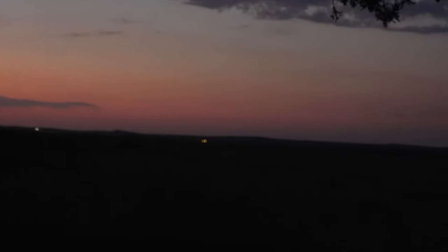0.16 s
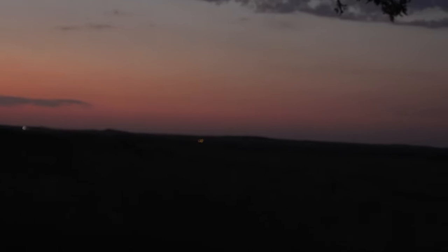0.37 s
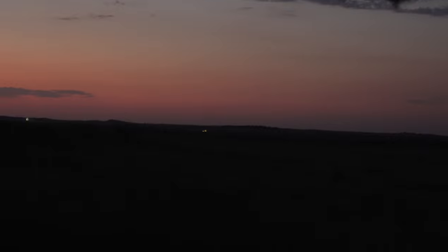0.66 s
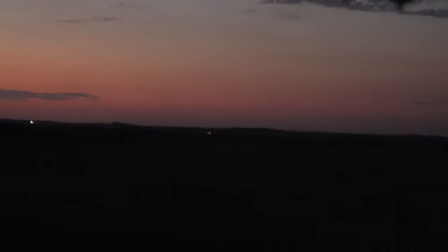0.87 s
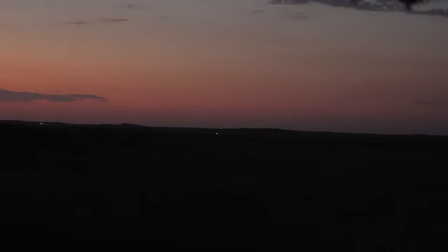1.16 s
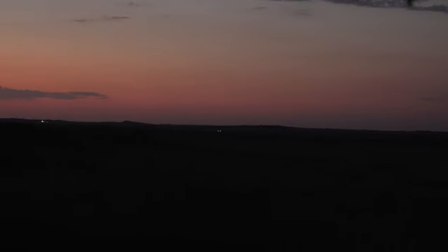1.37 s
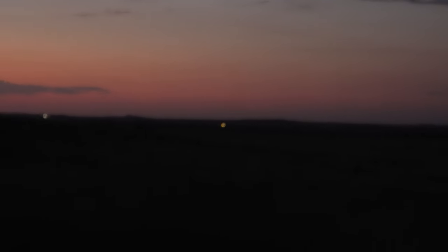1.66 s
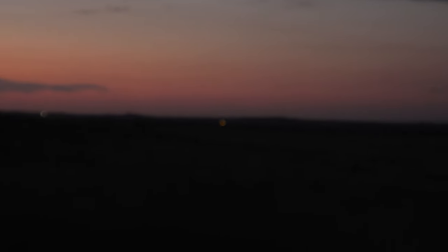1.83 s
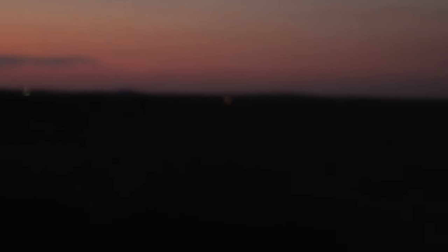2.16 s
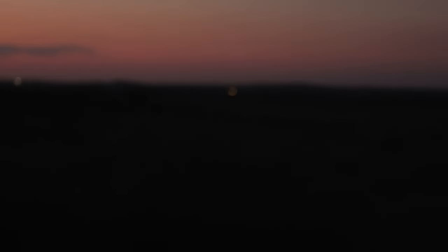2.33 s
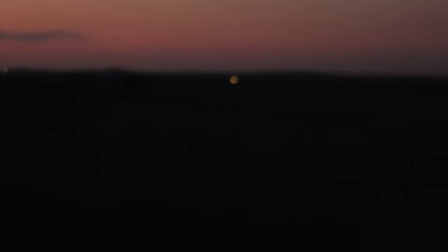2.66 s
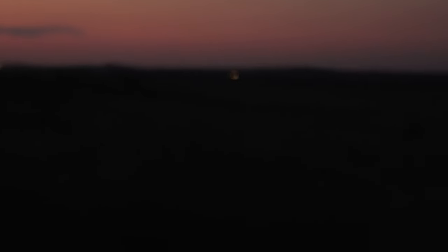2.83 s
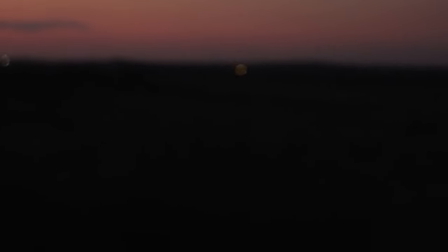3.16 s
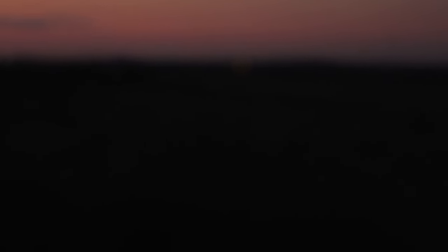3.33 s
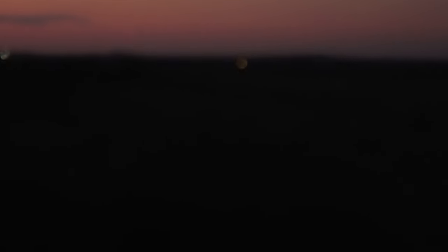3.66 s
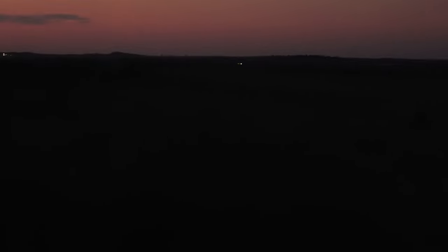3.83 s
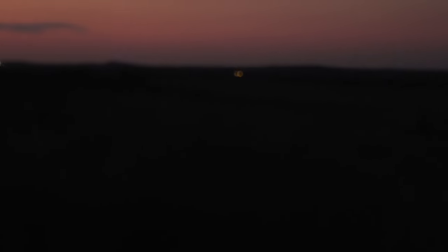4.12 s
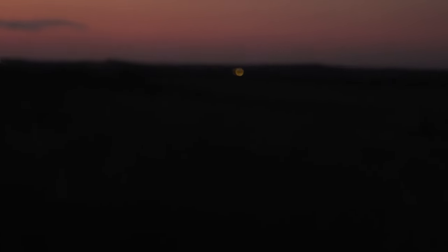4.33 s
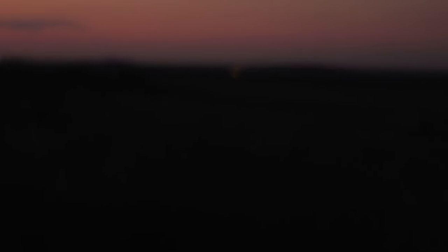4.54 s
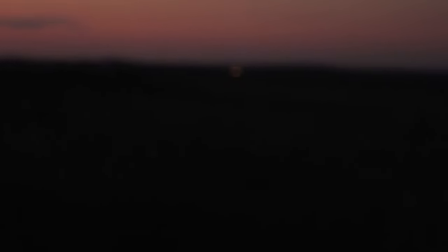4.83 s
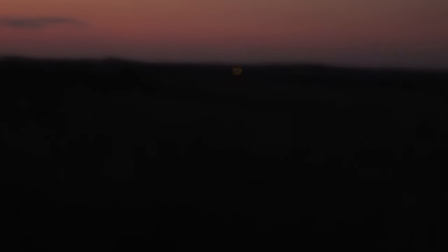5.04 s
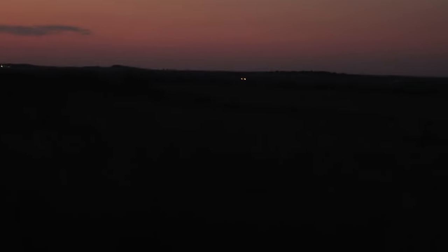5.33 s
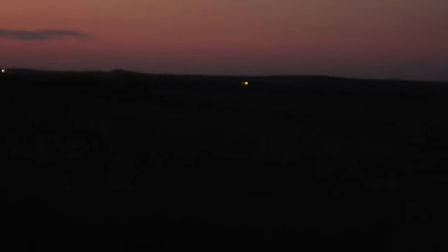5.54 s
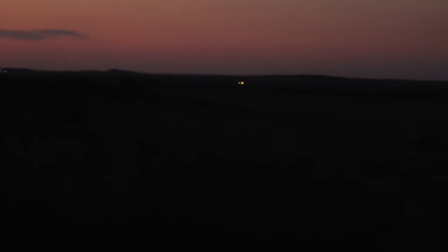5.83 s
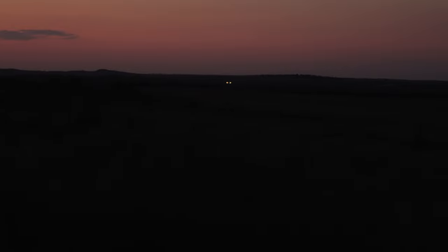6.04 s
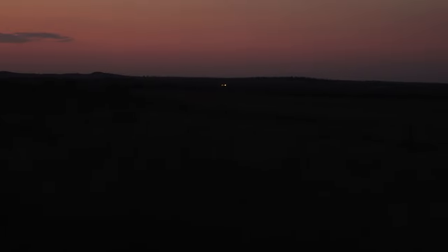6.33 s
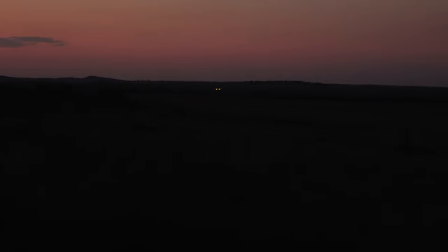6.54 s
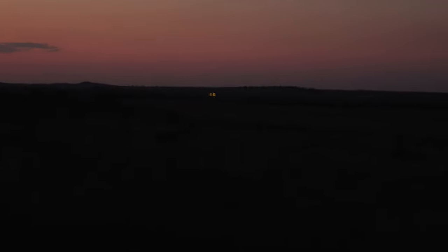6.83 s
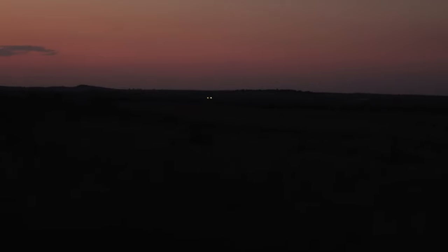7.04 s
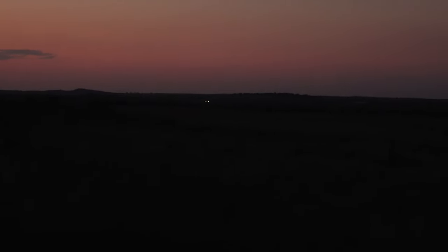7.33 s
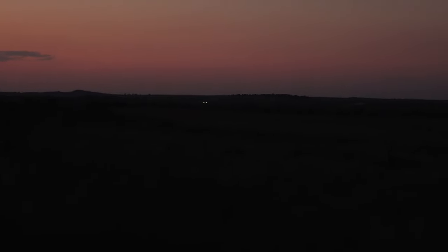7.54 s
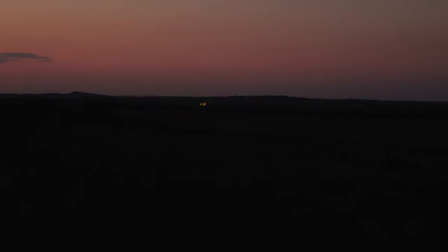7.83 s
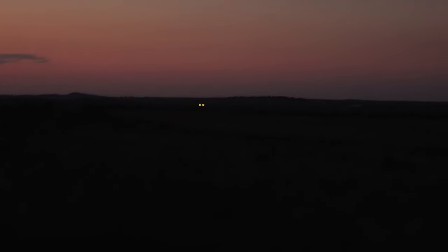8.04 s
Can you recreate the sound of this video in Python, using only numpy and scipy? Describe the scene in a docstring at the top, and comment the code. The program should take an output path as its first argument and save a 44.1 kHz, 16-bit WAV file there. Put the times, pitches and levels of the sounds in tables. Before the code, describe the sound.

An evening insect chorus shimmers steadily outdoors with low wind rumble, then a close tree cricket bursts into a long, loud, pulsing trill.

```python
"""Dusk over open fields, a hand-held microphone in light wind. From the start far tree crickets trill, field
crickets chirp, other insects buzz, tick and whine, and the wind rumbles; all this goes on throughout.
A near tree cricket trills briefly at 0.3 s; a close field cricket chirps at 1.2 and 3.3 s. From 5.6 s the near
one gives a long loud trill while soft knocks reach the housing. Cricket strokes and ticks are swelling, falling
near-sines; the buzz is chopped resonant noise, the whine a sine, wind and air are coloured noise."""
import sys
import numpy as np
from scipy import signal
from scipy.fft import rfft, irfft, next_fast_len
from scipy.io import wavfile

SR = 44100
rng = np.random.default_rng(int(sys.argv[2]) if len(sys.argv) > 2 else 0)


def master_out(mix):
    """Clip the mix to full scale and print it as 16-bit PCM to the path in sys.argv[1]."""
    frames = np.transpose(np.atleast_2d(mix))
    ceiling = np.clip(frames, -1, 1)
    pcm = np.round(ceiling * 32767).astype(np.int16)
    wavfile.write(sys.argv[1], SR, pcm)


N = 360738


def from_db(db):
    """Decibels to gain."""
    return 10 ** (np.asarray(db, float) / 20)


def rms_one(x):
    """Scale to rms 1."""
    return x / np.sqrt(np.mean(x ** 2) + 1e-20)


def in_time(rows):
    """Columns of a curve table, interpolated to one value per sample."""
    s, *columns = np.transpose(rows)
    return [np.interp(np.arange(N) / SR, s, column) for column in columns]


def drift(rate):
    """Slow random curve of rms 1, changing about `rate` times a second."""
    knots = rng.standard_normal(N // 40 + 2002)  # one knot every 40 samples
    r = np.exp(-80 * np.pi * rate / SR)
    slow = signal.lfilter([1], [1, -2 * r, r * r], knots)[2000:]  # the filter has settled by here
    return np.interp(np.arange(N) / 40, np.arange(len(slow)), rms_one(slow))


def coloured(spectrum):
    """Noise of rms 1 whose density follows the given curve."""
    size = next_fast_len(N)
    hz = np.maximum(np.arange(size // 2 + 1) * SR / size, 1)
    points_hz, points_db = np.transpose(spectrum)
    gain = from_db(np.interp(np.log(hz), np.log(points_hz), points_db))
    white = rfft(rng.standard_normal(size))
    return rms_one(irfft(white * gain, size)[:N])


def resonance(x, hz, width_hz):
    """Two-pole resonance with gain 1 on top."""
    r = np.exp(-np.pi * width_hz / SR)
    feedback = [1, -2 * r * np.cos(2 * np.pi * hz / SR), r * r]
    return signal.lfilter(np.array([1, 0, -1]) * (1 - r * r) / 2, feedback, x)


def strokes(mid_s, hz, peak_db, length_s, fall_hz, bend, peak_at, pointed, overtones_db, rough, turns=None):
    """Wing strokes: scraper over file drives the wing as a near sine that slows down towards the end."""
    share = np.linspace(0, 1, int(length_s * SR))
    chance = rng.standard_normal((len(mid_s), 9))
    # the given pitch holds at mid-stroke; fall_hz is the whole drop from start to end
    slowing = share ** bend - .5 ** bend
    phase = np.cumsum(np.asarray(hz)[:, None] - fall_hz * slowing, axis=1) * 2 * np.pi / SR
    # where the wing stands in its swing at mid-stroke: given, or by chance
    turns = chance[:, 0] if turns is None else turns
    phase = phase - phase[:, [len(share) // 2]] + 2 * np.pi * turns[:, None]
    # warp time so that the swell peaks at peak_at
    warp = np.log(.5) / np.log(np.clip(peak_at, .2, .8))
    swell = np.abs(np.sin(np.pi * share ** warp)) ** pointed
    # uneven teeth make the level wobble within a stroke
    wobble = chance[:, 1:] @ np.cos(np.pi * np.outer(np.arange(1, 9), share)) / 2
    overtones = sum(from_db(db) * np.sin((k + 2) * phase) for k, db in enumerate(overtones_db))
    tone = np.sin(phase) + overtones
    sound = from_db(peak_db)[:, None] * swell * (1 + rough * wobble) * tone
    start = np.round((np.asarray(mid_s)[:, None] - length_s / 2) * SR).astype(int)
    at = start + np.arange(len(share))
    inside = (at >= 0) & (at < N)
    return np.bincount(at[inside], sound[inside], N)


def chirped(first_s, gap_ms, count):
    """Stroke times of chirps, one row per chirp; the gap runs from middle to middle."""
    gaps_ms = gap_ms * np.ones(len(first_s))
    return np.asarray(first_s)[:, None] + np.outer(gaps_ms, np.arange(count)) / 1000


# Microphone self-noise, relative density: pitch_hz, level_db (per Hz)
HISS = [(25, -16), (100, -17), (200, -2.5), (400, 0), (1000, -2.5), (1500, -15), (2800, -7.5), (4500, -31),
        (6000, -13.5), (7500, -0.5), (15700, -2.5)]
HISS_DB = -79.5  # rms


def microphone_hiss():
    """Self-noise of the microphone, of opposite sign in the two channels."""
    return from_db(HISS_DB) * coloured(HISS) * np.array([[1], [-1]])


# Distant air and fields, relative density: pitch_hz, level_db (per Hz)
AIR = [(120, -2.5), (250, 3), (420, -3.5), (700, 0), (900, -3), (1400, 0), (2000, -2), (3000, -6.5),
       (5300, -4.5), (7500, -7), (8200, -18.5), (11500, -16.5), (12500, -23), (15700, -20)]
AIR_DB = -62.5  # rms before a slow drift


def distant_air():
    """The open distance: broad coloured noise that drifts slightly in level."""
    return from_db(AIR_DB + .5 * drift(0.59)) * coloured(AIR)


# Wind at the microphone, rms before gusting: time_s, rumble_db, flutter_db
WIND = [(0.0, -56, -53), (0.8, -49.5, -61.5), (1.25, -55.5, -52.5), (1.59, -52.5, -61), (1.93, -58.5, -56),
        (2.53, -50.5, -58), (3.26, -50, -55), (3.6, -54, -58), (4.51, -56.5, -58), (4.97, -54.5, -54),
        (5.49, -58, -58.5), (5.76, -58.5, -53.5), (6.3, -59.5, -63.5), (6.88, -60, -56), (7.36, -64, -58),
        (7.61, -56, -57.5), (8.18, -60.5, -55.5)]
# Deep rumble, relative density: pitch_hz, level_db (per Hz)
RUMBLE = [(8.8, -31), (15, 2), (55, 5), (76, 0.5), (110, -7.5), (140, -42), (240, -120)]
# Higher flutter, relative density: pitch_hz, level_db (per Hz)
FLUTTER = [(47, -38), (80, -4.5), (141, -7), (226, -21.5), (387, -33), (450, -30.5), (580, -50),
           (990, -120)]


def wind():
    """Turbulence on the port: two lumpy low noises."""
    rumble_db, flutter_db = in_time(WIND)
    rumble = from_db(rumble_db + 2.5 * drift(4.7)) * coloured(RUMBLE)
    flutter = from_db(flutter_db + 1.42 * drift(16.5)) * coloured(FLUTTER)
    return rumble + flutter


# Faint whine, rms before its waver: time_s, level_db
WHINE = [(0.0, -72.5), (0.6, -73.5), (0.8, -78), (2.1, -75.5), (2.8, -84), (3.8, -76), (5.2, -91),
         (6.2, -75), (7.5, -75), (8.18, -83)]
WHINE_HZ = 1369.5


def whine():
    """A thin tone of steady pitch that wavers in level."""
    tone = np.sqrt(2) * np.sin(2 * np.pi * WHINE_HZ * np.arange(N) / SR)
    return from_db(in_time(WHINE)[0] + 1.3 * drift(2.6)) * tone


# Far tree crickets, before swell and sway: strokes_per_s, pitch_hz, peak_db
FAR_SINGERS = [(47.2, 3720, -53), (46.7, 3790, -56.5), (47.64, 3660, -56.5), (48, 3850, -58),
               (44.8, 3600, -66), (49.57, 3920, -52.5), (50.53, 3760, -55.5), (44.75, 3700, -63),
               (47.63, 3640, -57.5), (49.5, 3810, -60), (45.9, 3750, -62.5), (51.1, 3890, -57)]
# Level of the whole far chorus, slowly rising: time_s, level_db
FAR_SWELL = [(0.0, -1.5), (8.18, 1)]
# Shape of a far wing stroke, by keyword of strokes()
FAR_STROKE = dict(length_s=.017, fall_hz=230, bend=0.92, peak_at=0.46, pointed=0.95, overtones_db=[],
              rough=.2)
FAR_SWAY_DB = 1.6


def far_tree_crickets():
    """Each singer keeps its own rate, wandering a little, and its level sways with the air."""
    out = 0
    for per_s, hz, db in FAR_SINGERS:
        chance = rng.standard_normal((460, 3))
        wander_s = .00025 * np.cumsum(chance[:, 0])
        s = rng.random() / per_s + np.arange(460) / per_s + wander_s
        sway_db = FAR_SWAY_DB * drift(1.2)[np.clip(s * SR, 0, N - 1).astype(int)]
        peak_db = db + sway_db + 0.6 * chance[:, 2]
        out = out + strokes(s, hz + 20 * chance[:, 1], peak_db, **FAR_STROKE)
    return from_db(in_time(FAR_SWELL)[0]) * out


SCATTER_DB, SCATTER_T60_S = -10.5, 0.23


def scattered(x):
    """Grass and bushes blur the far chorus: a short diffuse tail of decaying noise."""
    t = np.arange(SR // 3) / SR
    tail = rng.standard_normal(len(t)) * from_db(-60 * t / SCATTER_T60_S)
    tail = tail / np.sqrt(np.sum(tail ** 2))
    return x + from_db(SCATTER_DB) * signal.fftconvolve(x, tail)[:N]


# Buzzing insect, rms: time_s, level_db
BUZZ = [(0.0, -70.5), (4.19, -69.5), (8.18, -71.5)]
# Its body resonances, levels before drift: pitch_hz, width_hz, level_db
BUZZ_BODY = [(5815, 30, -8), (6205, 40, -3), (6280, 100, -1), (6350, 40, -3), (6570, 60, -7),
             (6670, 70, -5), (6900, 120, -8), (7140, 60, -10), (7300, 400, -8)]
BUZZ_CLICKS_PER_S, BUZZ_WEAK_DB = 381.5, -0.5
BUZZ_DECAY_CLICKS = 0.45  # decay time constant, in click periods


def buzzer():
    """Unsteady body resonances, chopped by fast clicks that are strong and slightly weaker in turn."""
    cycles = np.cumsum(BUZZ_CLICKS_PER_S + 1.2 * drift(.4)) / SR
    weak_gain = from_db(BUZZ_WEAK_DB * (cycles % 2 >= 1))
    gate = np.exp(-(cycles % 1) / BUZZ_DECAY_CLICKS) * weak_gain
    body = 0
    for hz, width_hz, db in BUZZ_BODY:
        gain = from_db(db + 0.45 * drift(0.57))
        once = resonance(rng.standard_normal(N), hz, width_hz)
        body = body + gain * rms_one(resonance(once, hz, width_hz))
    band = signal.butter(3, [5400, 7700], "band", fs=SR, output="sos")
    chopped = signal.sosfilt(band, body * gate)
    return from_db(in_time(BUZZ)[0]) * rms_one(chopped)


# High ticking insects, levels before a random spread: start_s, end_s, ticks_per_s, pitch_hz, peak_db
TICKERS = [(0, 2.0, 14.08, 7610, -71), (2.5, 3.3, 9.1, 7510, -73), (3.6, 4.8, 11, 7610, -75),
           (0, 8.2, 9, 6500, -79)]
# Shape of a tick, by keyword of strokes()
TICK_STROKE = dict(length_s=0.038, fall_hz=40, bend=0.73, peak_at=0.38, pointed=2.4, overtones_db=[],
               rough=.2)


def tickers():
    """Short pure notes at a nearly even pace."""
    out = 0
    for start, end, per_s, hz, db in TICKERS:
        s = np.arange(start, end, 1 / per_s)
        chance = rng.standard_normal((140, 2))[:len(s)]
        tick_s = s + 0.0034 * chance[:, 0]
        out = out + strokes(tick_s, np.full(len(s), hz), db + 1.9 * chance[:, 1], **TICK_STROKE)
    return out


# Clear chirps of three strokes, before shape and spread: first_stroke_middle_s, pitch_hz, stroke_gap_ms, peak_db
CHIRPS = [(0.036, 4630, 53, -53), (0.131, 4590, 53, -52), (0.172, 4335, 58, -50), (0.216, 5120, 57, -58),
          (0.303, 4670, 54, -49), (0.574, 4590, 58, -53), (0.581, 4300, 60, -51), (0.662, 5120, 57, -58),
          (0.729, 4670, 54, -51), (0.762, 4300, 57, -50), (0.976, 4510, 57, -53), (1.028, 4630, 61, -52),
          (1.095, 5120, 57, -59), (1.27, 4335, 53, -50), (1.385, 4300, 55, -51), (1.428, 4630, 56, -51),
          (1.529, 5120, 57, -58), (1.649, 4670, 54, -52), (1.808, 4335, 60, -50), (1.997, 5120, 57, -57),
          (2.03, 4670, 55, -50), (2.107, 4670, 56, -51), (2.223, 4550, 54, -51), (2.234, 4300, 54, -51),
          (2.252, 4300, 58, -50), (2.421, 5120, 57, -57), (2.504, 4630, 60, -50), (2.647, 4630, 57, -48),
          (2.666, 4300, 58, -51), (2.712, 4335, 62, -49), (2.864, 5120, 57, -58), (3.069, 4510, 54, -52),
          (3.075, 4710, 52, -52), (3.094, 4300, 54, -49), (3.311, 5120, 57, -60), (3.332, 4630, 56, -51),
          (3.387, 4750, 57, -52), (3.461, 4300, 56, -52), (3.549, 4300, 56, -51), (3.564, 4670, 58, -50),
          (3.772, 5120, 57, -58), (3.891, 4710, 54, -48), (3.928, 4335, 56, -52), (3.995, 4300, 57, -50),
          (4.232, 5120, 57, -57), (4.295, 4670, 53, -48), (4.46, 4670, 52, -49), (4.466, 4335, 57, -51),
          (4.678, 5120, 57, -56), (4.714, 4670, 54, -50), (4.725, 4335, 53, -51), (4.764, 4550, 54, -52),
          (5.011, 4670, 60, -50), (5.023, 4335, 56, -51), (5.131, 4550, 57, -49), (5.144, 5120, 57, -56),
          (5.429, 4510, 57, -52), (5.553, 4670, 55, -50), (5.554, 4300, 56, -49), (5.597, 5120, 57, -56),
          (5.601, 4550, 53, -52), (5.626, 4630, 59, -52), (5.806, 4670, 53, -52), (5.948, 4710, 52, -51),
          (5.95, 4300, 52, -48), (6.046, 5120, 57, -58), (6.228, 4710, 56, -52), (6.382, 4300, 56, -51),
          (6.411, 4300, 57, -50), (6.487, 5120, 57, -57), (6.617, 4670, 52, -50), (6.771, 4630, 55, -51),
          (6.819, 4300, 56, -52), (6.855, 4230, 58, -52), (6.914, 4335, 56, -48), (6.933, 5120, 57, -58),
          (7.272, 4630, 57, -50), (7.283, 4670, 58, -52), (7.307, 4265, 55, -52), (7.35, 4300, 57, -52),
          (7.378, 5120, 57, -59), (7.433, 4335, 58, -49), (7.54, 4630, 52, -50), (7.711, 4630, 60, -52),
          (7.858, 4300, 53, -51), (7.869, 5120, 57, -57), (7.926, 4335, 56, -50)]
# Field cricket voices, low to high: pitch_hz, stroke_length_s, fall_hz, second_harmonic_db, third_harmonic_db
FIELD_VOICES = [(4290, 0.035, 420, -32, -36.5), (4615, 0.03, 570, -29, -30), (4680, .032, 390, -22, -36.5),
                (4950, 0.02, 450, -22, -36)]
# Far chirps of each voice, before shape and spread: peak_db
FAINT_VOICES_DB = [-59, -58, -62, -72]
# Stroke shape shared by these voices, by keyword of strokes()
FIELD_STROKE = dict(bend=3.2, peak_at=0.58, pointed=0.86, rough=0.23)
CHIRP_SHAPE_DB, STROKE_SPREAD_DB = [-1, 0, -0.5], 0.43  # the middle stroke is loudest
FAINT_CHIRPS_PER_S, FAINT_SPREAD_HZ, FAINT_GAP_MS = 57, 95, 56  # rate of all voices together


def field_crickets():
    """Clear chirps take a voice by pitch; below them a dense scatter of faint chirps from far away."""
    first_s, hz, gap_ms, db = np.transpose(CHIRPS)
    voice = np.searchsorted([4420, 4760, 4990], hz)  # pitch borders between voices, Hz
    faint_count = int(FAINT_CHIRPS_PER_S / len(FIELD_VOICES) * N / SR)
    out = 0
    for k, (voice_hz, length_s, fall_hz, *overtones_db) in enumerate(FIELD_VOICES):
        mine = voice == k
        chance = rng.standard_normal((200, 3))[:faint_count]
        faint_s = rng.random(200)[:len(chance)] * N / SR - FAINT_GAP_MS / 1000
        faint_gap_ms = FAINT_GAP_MS + 2.5 * chance[:, 2]
        faint_hz = voice_hz + FAINT_SPREAD_HZ * chance[:, 0]
        faint_db = FAINT_VOICES_DB[k] + 2.1 * chance[:, 1]
        all_s = chirped(np.append(first_s[mine], faint_s), np.append(gap_ms[mine], faint_gap_ms), count=3)
        all_hz = np.append(hz[mine], faint_hz)
        all_db = np.append(db[mine], faint_db)[:, None] + CHIRP_SHAPE_DB
        all_db = all_db + STROKE_SPREAD_DB * rng.standard_normal(all_s.shape)
        out = out + strokes(all_s.ravel(), np.repeat(all_hz, 3), all_db.ravel(), length_s, fall_hz,
                            overtones_db=overtones_db, **FIELD_STROKE)
    return out


# Two-stroke chirps of one field cricket: first_stroke_middle_s
PAIR_S = [1.013, 1.343, 1.668, 2.013, 2.327, 2.696, 3.08, 3.383, 3.7, 4.02, 4.26, 4.592, 4.964, 5.294,
          5.633, 5.991, 6.316, 6.69, 7.03, 7.34, 7.638, 7.921]
PAIR_HZ, PAIR_GAP_MS, PAIR_DB = 5080, 53, -61.5


def pair_cricket():
    """Two high strokes, about three times a second, in the highest field cricket voice."""
    s = chirped(PAIR_S, PAIR_GAP_MS, count=2).ravel()
    _, length_s, fall_hz, *overtones_db = FIELD_VOICES[-1]
    return strokes(s, np.full(len(s), PAIR_HZ), np.full(len(s), PAIR_DB), length_s, fall_hz,
                   overtones_db=overtones_db, **FIELD_STROKE)


# Bright field cricket, levels before the stroke shape: first_stroke_middle_s, peak_db
BRIGHT_CHIRPS = [(-.05, -50.5), (.469, -53.5), (.956, -56), (1.427, -53), (1.905, -53.5), (2.414, -53),
                 (2.925, -50.5), (3.43, -51), (3.955, -50), (4.435, -51), (4.981, -50.5), (5.496, -51.5),
                 (6.184, -49), (6.736, -50), (7.242, -51), (7.85, -50.5)]
# Shape of its stroke, by keyword of strokes()
BRIGHT_STROKE = dict(length_s=.038, fall_hz=330, bend=2.8, peak_at=0.52, pointed=1.5, rough=0.3)
BRIGHT_HZ, BRIGHT_THIRD_DB, BRIGHT_GAP_MS = 4877, -31, 71.5
BRIGHT_SHAPE_DB, BRIGHT_OCTAVE_DB = [-3.5, -2, -2.5], [-15.5, -24, -22.5]  # by stroke: level, second harmonic


def bright_cricket():
    """One steady field cricket: chirps of three long strokes; the first has the clearest second harmonic."""
    first_s, db = np.transpose(BRIGHT_CHIRPS)
    s = chirped(first_s, BRIGHT_GAP_MS, count=3).ravel()
    octave_db = np.tile(BRIGHT_OCTAVE_DB, len(db))[:, None]
    peak_db = (db[:, None] + BRIGHT_SHAPE_DB).ravel()
    return strokes(s, np.full(len(s), BRIGHT_HZ), peak_db,
                   overtones_db=[octave_db, BRIGHT_THIRD_DB], **BRIGHT_STROKE)


# Close field cricket, heard twice: stroke_middle_s, pitch_hz, peak_db
CLOSE_STROKES = [(1.238, 4600, -43.5), (1.287, 4590, -42), (3.338, 4440, -45), (3.388, 4480, -40),
                 (3.447, 4530, -37.5)]
# Shape of its stroke, by keyword of strokes()
CLOSE_STROKE = dict(length_s=.022, fall_hz=600, bend=4.0, peak_at=.62, pointed=.7, overtones_db=[-29, -37],
                rough=.2)


def close_cricket():
    """Short strokes that hold their pitch and drop at the end."""
    return strokes(*np.transpose(CLOSE_STROKES), **CLOSE_STROKE)


# Soft knocks of the hand on the housing: middle_s, peak_db, pitch_hz (at the middle), length_cycles
KNOCKS = [(5.616, -32.5, 187, 3.4), (5.645, -37, 61, 1.2), (6.112, -42.5, 170, 3), (6.132, -40.5, 110, 4.9),
          (6.157, -37.5, 184, 1.8), (6.793, -29.5, 196, 1.85), (6.809, -40, 130, 3.2),
          (6.829, -39.5, 64.5, 2.4), (7.428, -42, 206, 3), (7.449, -35, 218, 1.35), (7.491, -41, 99.5, 2.2),
          (7.89, -33.5, 197, 2.15)]
# Short rustles near the hand, rms before the envelope: middle_s, length_s, low_hz, high_hz, level_db
RUSTLES = [(.85, .08, 457, 796, -66), (4.243, 0.0045, 300, 1200, -55), (5.03, .01, 2500, 3420, -63),
           (6.79, 0.012, 2400, 3300, -63), (7.932, 0.074, 638, 885, -64.5), (8.017, .05, 1510, 1800, -69),
           (8.031, .05, 2900, 3400, -61)]
KNOCK_SLOWING = 0.087  # share of pitch lost per cycle


def handling():
    """Knocks set the housing swinging for a few cycles; rustles are brief puffs of band noise."""
    t, out = np.arange(N) / SR, 0
    for s, db, hz, cycles in KNOCKS:
        turns = (t - s) * hz
        swing = np.cos(2 * np.pi * turns * (1 - KNOCK_SLOWING * turns / 2))
        out = out + from_db(db) * np.exp(-(turns / cycles * 3) ** 2) * swing
    for s, length, low_hz, high_hz, db in RUSTLES:
        band = signal.butter(2, [low_hz, high_hz], "band", fs=SR, output="sos")
        puff = rms_one(signal.sosfilt(band, rng.standard_normal(N)))
        out = out + from_db(db) * np.exp(-((t - s) / length * 2) ** 2) * puff
    return out


# Ground and bushes: delay_s, level_db
ECHOES = [(.004, -23), (0.01, -18.5), (.023, -15.5), (.041, -22.5)]


def outdoors(x):
    """The sound and a few weak echoes of it."""
    return x + sum(from_db(db) * np.pad(x, (int(lag * SR), 0))[:N] for lag, db in ECHOES)


# Near trills, before spread: first_stroke_s, strokes, first_gap_ms, start_pitch_hz, first_peak_db, full_peak_db
NEAR_TRILLS = [(0.2733, 16, 19.9, 3900, -50, -36), (5.6385, 131, 19.2, 3868, -43, -31)]
# Shape of a near wing stroke, by keyword of strokes()
TREE_STROKE = dict(length_s=.016, fall_hz=280, bend=.7, peak_at=0.52, pointed=1.5, overtones_db=[-36.5, -44.5],
               rough=0.06)
GAP_GROWS_MS = .007  # each gap is this much longer than the last
SWELL_S, PITCH_RISE_HZ_PER_S = 0.27, 18  # time constant of the swell in dB; creep of pitch
MISSED_STROKE_S = 7.813


def near_tree_cricket():
    """Strokes slowly space out as a trill goes on, while it swells towards full level; one stroke is missed."""
    out = 0
    for first_s, count, gap_ms, start_hz, first_db, full_db in NEAR_TRILLS:
        k = np.arange(count)
        # spread of time (s), pitch (Hz), level (dB) and phase (turns)
        chance = rng.standard_normal((count, 4)) * [0.00069, 24, 0.33, 0.12]
        s = first_s + (gap_ms * k + GAP_GROWS_MS * k * (k - 1) / 2) / 1000
        grown = 1 - np.exp(-(s - first_s) / SWELL_S)
        hz = start_hz + PITCH_RISE_HZ_PER_S * (s - first_s)
        db = first_db + (full_db - first_db) * grown
        s = np.round((s + chance[:, 0]) * SR) / SR
        # the wing rings on between strokes, so each stroke nearly keeps step with the last
        turns = np.cumsum(np.diff(s, prepend=0) * hz + chance[:, 3])
        db = np.where(abs(s - MISSED_STROKE_S) < .008, -90, db)
        out = out + strokes(s, hz + chance[:, 1], db + chance[:, 2], turns=turns, **TREE_STROKE)
    return out


NEAR_ECHO_DB = -5  # the near singer's echoes are weaker


def scene():
    """All sources reach one microphone; only its hiss differs between the channels."""
    chorus = scattered(far_tree_crickets())
    chirpers = field_crickets() + pair_cricket() + bright_cricket() + close_cricket()
    insects = outdoors(chorus + chirpers + tickers()) + buzzer()
    near = near_tree_cricket()
    near_echoes = from_db(NEAR_ECHO_DB) * (outdoors(near) - near)
    mono = insects + near + near_echoes + distant_air() + whine() + wind() + handling()
    return mono + microphone_hiss()


CUTOFF_HZ = 15720


def record(dry):
    """A steep low-pass cuts the top of the microphone signal."""
    return signal.sosfilt(signal.ellip(12, .5, 70, CUTOFF_HZ, fs=SR, output="sos"), dry)


dry = scene()
out = record(dry)
master_out(out)
```